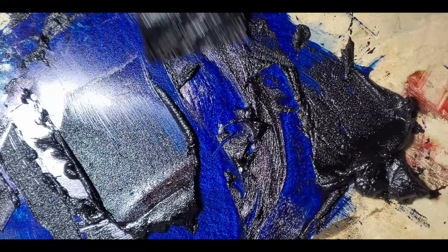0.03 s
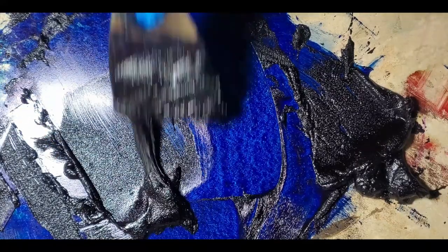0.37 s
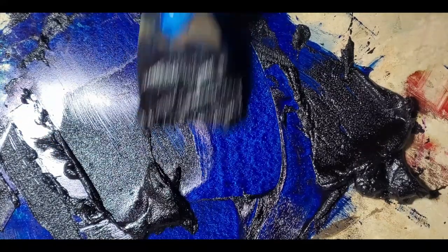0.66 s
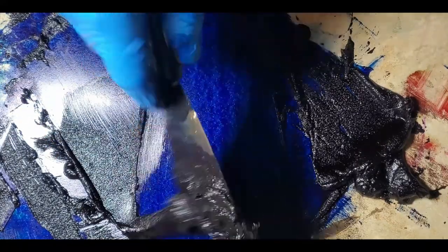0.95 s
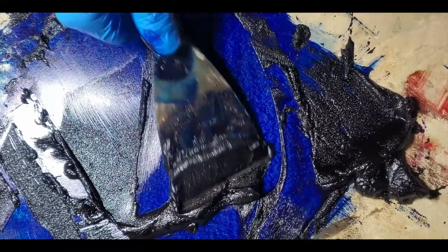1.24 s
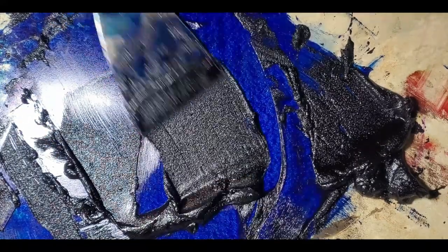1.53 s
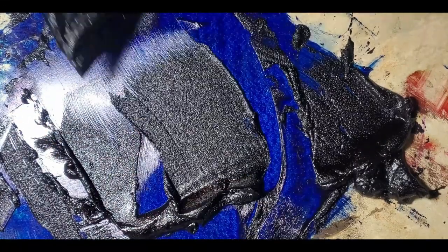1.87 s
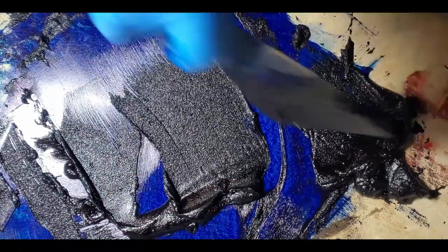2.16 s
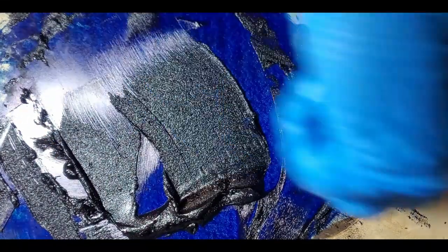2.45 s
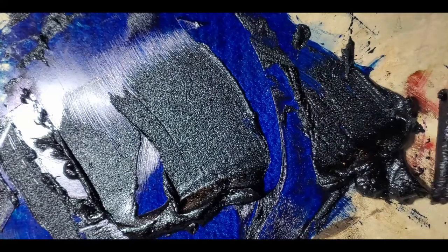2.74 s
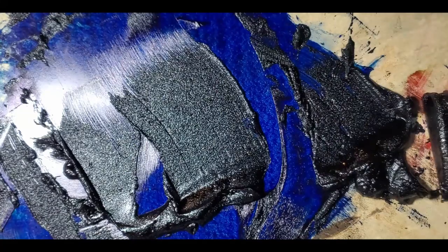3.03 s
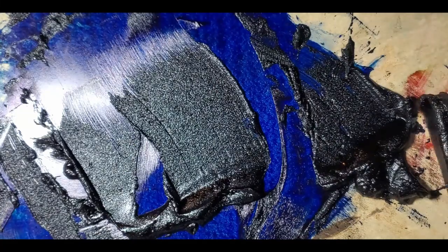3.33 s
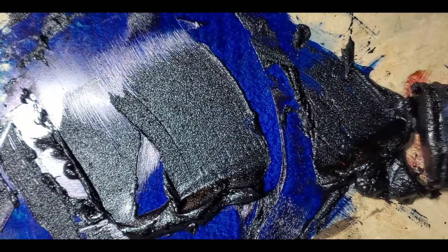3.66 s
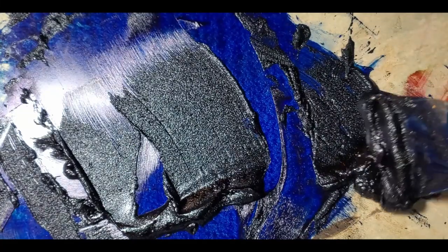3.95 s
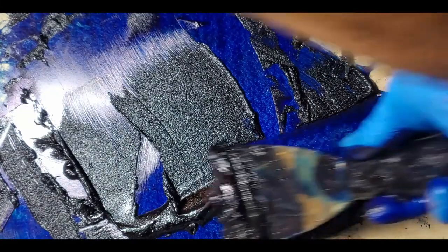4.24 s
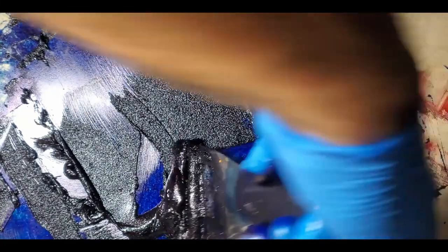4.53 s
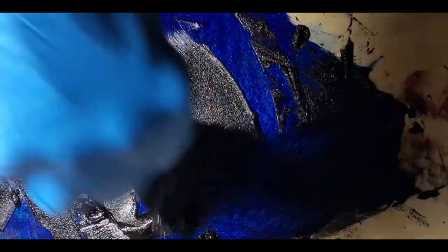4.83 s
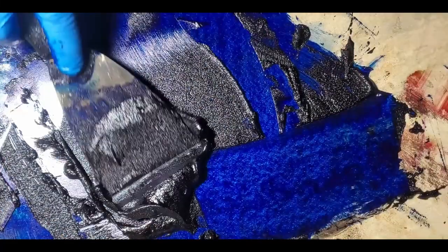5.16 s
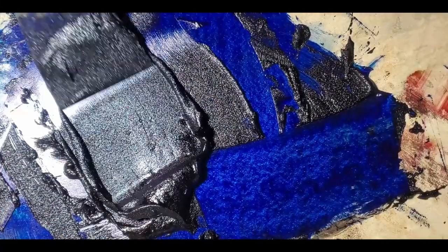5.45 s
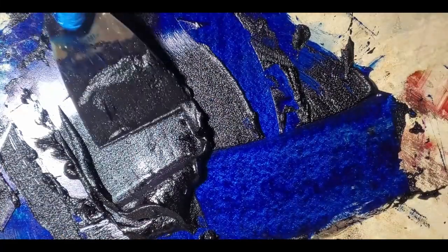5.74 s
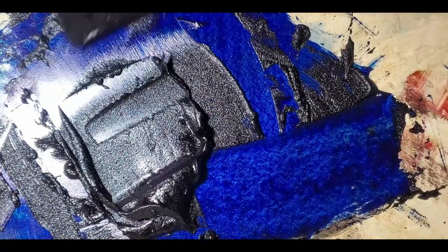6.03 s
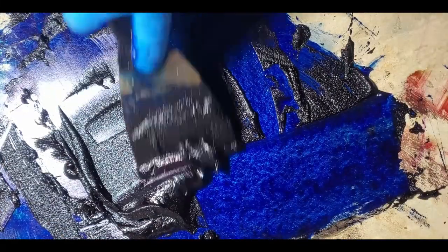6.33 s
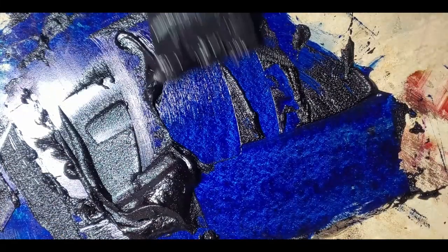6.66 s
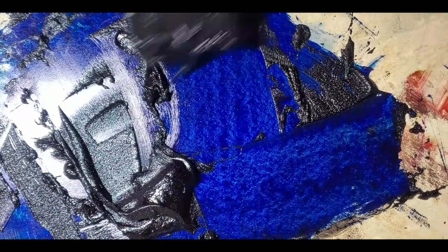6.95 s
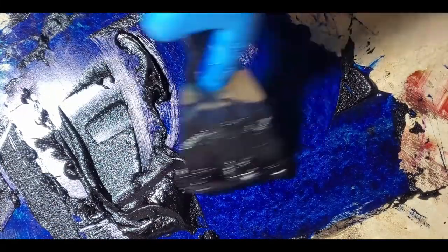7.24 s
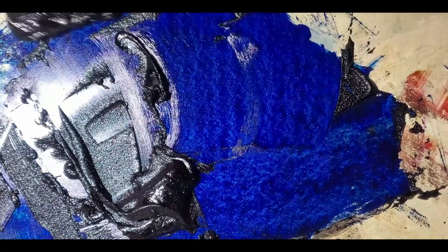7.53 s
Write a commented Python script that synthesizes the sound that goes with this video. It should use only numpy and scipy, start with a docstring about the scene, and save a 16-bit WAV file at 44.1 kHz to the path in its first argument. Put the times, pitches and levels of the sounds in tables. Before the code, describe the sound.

Close by in a quiet studio, a steel palette knife spreads thick paint over a flat plate. Two gritty, hissing scrapes come first, mixed with taps, followed by a lull of faint rustling. Midway the blade clicks repeatedly, the plate knocks dully and a rougher scrape follows. After another pause come three quick strokes, the last with a thud through the table. A ventilation fan hums low throughout.

```python
"""In a quiet studio, a steel palette knife spreads thick, gritty paint over a flat plate, close by.
The blade lands with a tap, then drags: grit crackles under its edge and sets blade and plate ringing.
Faint hiss and rustle come from light blade glides or the moving gloved hand. The plate rocks with dull
knocks, taps thud through the table, and an arm bumps it once. A ventilation fan hums behind it all."""
import sys
import numpy as np
from scipy import signal
from scipy.fft import rfft, irfft, next_fast_len
from scipy.io import wavfile
from scipy.ndimage import uniform_filter1d

SR = 44100
rng = np.random.default_rng(int(sys.argv[2]) if len(sys.argv) > 2 else 0)


def materialize(psi):
    """Save the field psi as 16-bit PCM at rate SR to the path in sys.argv[1].

    A 1-D psi becomes a single channel; in a 2-D psi each row is a channel.
    """
    bounded = np.clip(np.atleast_2d(psi).T, -1, 1)
    quanta = np.round(bounded * 32767).astype(np.int16)
    wavfile.write(sys.argv[1], SR, quanta)


N = 343539

# Levels in the tables are relative. ring_s and fade_s are the time taken to die away by 60 dB.
# Tones of the fan and its motor: pitch_hz, level_db, waver_hz
FAN_TONES = [(41.2, -51.5, 0.056), (57.8, -54, .05), (69.2, -61, .1), (120.2, -60, 0.12), (125.7, -79, 1.1),
             (171, -73, 0.96), (266.6, -69, 1.9), (344, -69.5, 2.8), (406, -67, 2), (486, -72.5, 2.8),
             (550, -69.5, 3.7), (670, -71.5, 2.7), (800, -84.5, 3.7)]
# Tone colour of the moving air and faint hiss: pitch_hz, level_db
AIR_COLOUR = [(20, -33.5), (35, -19.5), (50, 0.5), (80, -8.5), (120, -7), (220, -17.5), (500, -21),
              (1200, -20.5), (2700, -33), (4500, -45), (6800, -49), (8200, -56), (13000, -35.5),
              (16000, -48.5)]
# How alike the air sounds left and right: pitch_hz, likeness (1 same, 0 unrelated, -1 opposite)
AIR_LIKENESS = [(60, 0.96), (300, .9), (1000, 0.68), (4000, 0.058), (12000, .1)]
# Notes the table rings at under the arm: pitch_hz, level_db, ring_s
TABLE_ARM_NOTES = [(75.3, -35.5, 0.63), (104.3, -32, 0.25), (157, -34.5, 0.55), (175.8, -28, 0.38),
                   (202, -29.5, 0.14)]
# Notes the table rings at under the blade: pitch_hz, level_db, ring_s
TABLE_TAP_NOTES = [(63, 2, .4), (78, -21, .3), (182.5, -11.5, 0.15)]
# The plate rocks as weight comes onto it: start_s, level_db
PLATE_ROCKS = [(0.474, -38.5), (0.547, -65), (0.573, -38.5), (3.051, -44), (3.336, -47), (3.438, -41.5),
               (3.808, -41.5)]
# Low notes of the rocking plate: pitch_hz, level_db, ring_s
ROCK_NOTES = [(148.3, 0, 0.15), (210, -5.5, 0.14), (351, 2, 0.14), (393, -11.5, 0.044)]
# Broad tone colour of the scrape: pitch_hz, level_db
SCRAPE_COLOUR = [(120, -41), (200, -1.5), (340, -7.5), (519, -12.5), (683, 1), (791, -10), (1210, 0),
                 (3690, 1), (5330, -10.5), (6880, -13), (7970, -20.5), (12800, -6), (16000, -13)]
# Pitches the scraped plate rings at: pitch_hz, width_hz, strength_db
PLATE_PEAKS = [(372, 60, 8), (669, 54, 12), (700, 70, 12), (853, 25, 8), (1086, 35, 12), (1200, 44, 8),
               (1307, 86, 11), (1437, 165, 10), (1681, 34, 7), (1844, 111, 11), (1917, 33, 12),
               (1942, 24, 9), (2067, 76, 10), (2235, 97, 10), (2367, 68, 11), (2657, 115, 11),
               (2768, 50, 10), (2969, 107, 10), (3131, 250, 6), (3331, 82, 12), (3568, 49, 11),
               (3655, 82, 12), (3850, 103, 12), (3991, 20, 4)]
# Pitches the steel blade rings at: pitch_hz, width_hz, strength_db
BLADE_PEAKS = [(4295, 55, 1), (4551, 91, 4), (4846, 35, 3), (5072, 29, 4), (5258, 39, 2), (5720, 47, 4),
               (5891, 73, 6), (6230, 25, 4), (6835, 151, 5), (7186, 150, 1), (7900, 49, 2), (8508, 35, 6),
               (8703, 35, 7), (9083, 37, 3), (9179, 28, 6), (9497, 38, 7), (9760, 128, 1), (10524, 56, 0),
               (10718, 59, 8), (11146, 100, 3), (11734, 87, 4), (12018, 40, 0), (12476, 38, 7),
               (12716, 55, 5), (13148, 213, 4), (13542, 69, 1), (13950, 300, -1), (14705, 53, 5),
               (15173, 300, 1), (15577, 63, 2)]
# The blade sends its sound unevenly to the two sides: pitch_hz, left_minus_right_db
BLADE_BALANCE = [(700, -1), (1700, 0), (2500, 5), (3700, 3.5), (4500, -6.5), (5300, 3), (7200, -10),
                 (8400, 17), (9800, -1), (11200, 5.5), (13200, 13.5), (15500, 24)]
# How alike the scrape is left and right: pitch_hz, likeness (-1 to 1)
SCRAPE_LIKENESS = [(60, 0.86), (300, 0.99), (700, 0.77), (1400, 0.096), (3100, 0.15), (7000, -0.42),
                   (15000, 0)]
# Faint rustles from light blade glides or the moving gloved hand: start_s, length_s, rasp_db, hiss_db
SOFT_RUSTLES = [(0.505, 0.032, -49, -50), (0.898, 0.32, -68, -63.5), (1.038, 0.088, -66, -62),
                (1.2, 0.064, -49, -48), (1.297, 0.16, -62.5, -61.5), (1.574, 0.36, -67, -62),
                (1.85, 0.75, -67, -61.5), (2.066, 0.21, -80, -68), (3.13, 0.14, -58, -64),
                (3.406, 0.1, -53, -59), (3.565, 0.057, -47, -57), (3.8, 0.13, -53, -53.5),
                (4.65, .45, -72, -58.5), (5.12, 0.12, -81.5, -61.5), (5.348, 0.16, -82, -66),
                (5.456, 0.084, -59, -58), (5.79, 0.093, -59, -60), (6.563, 0.14, -48.5, -36.5)]
# The blade touches down or flicks off: start_s, level_db, knock_db, tick_db, fade_s, table_thud_db
BLADE_TAPS = [(0.468, -30, -9.5, -2, 0.19, -43), (0.5473, -16, -5, -8, 0.087, -40),
              (1.0373, -34, -20, 0.5, 0.03, -72), (1.19, -18.5, -7, -2, 0.038, -37),
              (1.566, -43, -6.5, 1.5, 0.033, -70), (2.242, -49, -6, 3, 0.028, -70),
              (3.051, -40, 15.5, -17, 0.071, -53), (3.115, -36, -5.5, 1, 0.18, -46),
              (3.173, -39, -14, 0.5, 0.092, -72), (3.274, -44.5, 5.5, -9, 0.26, -45.5),
              (3.434, -14, -4.5, -18, 0.057, -39), (3.734, -35, -4, 4.5, 0.088, -42),
              (3.855, -11.5, -6.5, -11.5, 0.14, -40), (3.895, -24, 3, -9.5, 0.12, -60),
              (4.591, -36, -14, 4, 0.089, -76.5), (5.8297, -40.5, -10, 2.5, 0.025, -68),
              (6.089, -31, -4.5, -9, 0.45, -72), (6.549, -21.5, -5.5, -5.5, 0.069, -49),
              (6.798, -43, -12, 8.5, 0.07, -67.5), (7.062, -11, -4, -2, 0.11, -28),
              (7.228, -34.5, -10, 8.5, 0.049, -70), (7.560, -24.5, -10.5, -5, 0.077, -41.5)]
# The blade drags through the paint (drag is the low plate, rasp the grit, hiss the edge):
# start_s, speed_up_s, slow_down_s, drag_db, rasp_db, hiss_db, pressure_drop_db
PAINT_STROKES = [(-0.04, 0.061, 0.23, -39.5, -28, -18, 6), (0.56, 0.12, 0.15, -42, -32, -23, 5),
                 (1.683, 0.033, 0.11, -60.5, -51, -39, 1), (1.763, 0.027, 0.036, -62, -46.5, -37, 7),
                 (3.589, 0.056, 0.029, -26, -22, -30, -1), (3.857, 0.036, 0.079, -32.5, -21.5, -17, -1.5),
                 (3.968, 0.17, 0.22, -39, -27, -17, 8.5), (5.745, 0.016, 0.051, -50.5, -56, -53.5, 4),
                 (6.12, 0.14, 0.096, -43.5, -32.5, -21.5, 2.5), (6.596, 0.051, 0.13, -43, -31, -20, 7),
                 (7.064, 0.0099, 0.15, -44.5, -29.5, -17, 4), (7.603, 0.038, 0.065, -61.5, -54.5, -46, 1.5)]


def from_db(db):
    """Turn decibels into a number to multiply by."""
    return 10 ** (np.asarray(db) / 20)


def unit_level(x):
    """Scale a sound so that the average of left and right has a level (rms) of 1."""
    return x / np.sqrt(np.mean(np.atleast_2d(x).mean(axis=0) ** 2) + 1e-20)


def evened(x, span_s=0.018):
    """Hold the loudness steady, so that only the fine grain is left to chance."""
    power = uniform_filter1d(np.mean(x ** 2, axis=0), int(span_s * SR))
    return unit_level(x / np.sqrt(np.maximum(power, 1e-20)))


def at_hz(points, hz):
    """Read between a table's rows, giving each octave equal room."""
    points = np.array(points)
    return np.interp(np.log(hz + 1), np.log(points[:, 0]), points[:, 1])


def drift(per_s):
    """A smooth random wobble of about size 1, changing about per_s times a second."""
    knots = rng.standard_normal(N // 8)
    return np.interp(np.arange(N) / SR * per_s, np.arange(len(knots)), knots) / np.sqrt(2 / 3)


def butter(x, hz, kind, order=3):
    """Keep the lows, the highs or a band between."""
    return signal.sosfilt(signal.butter(order, hz, kind, fs=SR, output="sos"), x)


def shaped(x, gain_at, size=8192):
    """Colour a sound by gain_at(hz); the filter rings only after a hit (minimum phase)."""
    cepstrum = irfft(np.log(gain_at(np.arange(size // 2 + 1) * SR / size) + 1e-7))
    fold = 1 + np.sign(size // 2 - np.arange(size))
    fold[0] = 1
    response = irfft(np.exp(rfft(cepstrum * fold)))
    return signal.oaconvolve(x, response)[:N]


def stereo_noise(likeness):
    """White noise whose two sides are as alike at each pitch as the table says."""
    size = next_fast_len(N)
    alike = np.clip(at_hz(likeness, np.fft.rfftfreq(size, 1 / SR)), -.999, .999)
    mid, side = rfft(rng.standard_normal((2, size)))
    mid, side = mid * np.sqrt(1 + alike), side * np.sqrt(1 - alike)
    return unit_level(irfft([mid + side, mid - side], size)[:, :N])


def ring(force, notes):
    """Each push sets off pure tones that die away."""
    out = 0
    for hz, db, ring_s in notes:
        decay, turn = from_db(-60 / (ring_s * SR)), 2 * np.pi * hz / SR
        feedback = [1, -2 * decay * np.cos(turn), decay * decay]
        out = out + signal.lfilter([0, from_db(db) * np.sin(turn)], feedback, force + 1e-18)
    return out


def three_bands(x, floor_hz=220, low_hz=1300, high_hz=6000):
    """Split a scrape into the plate's lows, the grit's middle and the edge's highs."""
    low = butter(x, [floor_hz, low_hz], "band")
    return low, butter(x, [low_hz, high_hz], "band"), butter(x, high_hz, "high")


def fan(air_db=-52.5, lag_s=.0003):
    """Motor and fan blades hum in wavering tones over a soft rush of air, reaching the left first."""
    tones = 0
    for hz, db, waver_hz in FAN_TONES:
        cycles = rng.random() + np.cumsum(hz + waver_hz * drift(32)) / SR
        tones = tones + np.sqrt(2) * from_db(db) * np.sin(2 * np.pi * cycles)
    air = [shaped(x, lambda hz: from_db(at_hz(AIR_COLOUR, hz))) for x in stereo_noise(AIR_LIKENESS)]
    left, right = tones + from_db(air_db) * unit_level(np.array(air))
    return np.array([left, np.interp(np.arange(N) - lag_s * SR, np.arange(N), right)])


def studio_echo(x, fade_s=0.2, echo_db=-11.0, gap_s=0.00097, wall_hz=9000):
    """Add the room's weak wash of echoes, dulled by the walls."""
    t = np.arange(SR * 3 // 4) / SR
    noise = butter(rng.standard_normal((2, len(t))), wall_hz, "low", order=1)
    tail = noise * from_db(-60 * t / fade_s) * (t > gap_s)
    tail /= np.sqrt(np.sum(tail ** 2, axis=1, keepdims=True))
    return x + from_db(echo_db) * signal.oaconvolve(x, tail, axes=1)[:, :N]


def arm_bump(start_s=4.599, soft_hz=280, rebound_s=0.06, rebound_db=-6, count=3):
    """A soft blow and its dying rebounds wake only the table's low notes."""
    push = np.zeros(N)
    for k in range(count):
        push[round((start_s + k * rebound_s) * SR)] = from_db(k * rebound_db)
    return butter(ring(push, TABLE_ARM_NOTES), soft_hz, "low")


def rocking_plate(soft_hz=600):
    """The plate tips and knocks dully against the table."""
    push = np.zeros(N)
    for start_s, db in PLATE_ROCKS:
        push[round(start_s * SR)] = from_db(db)
    return butter(ring(push, ROCK_NOTES), soft_hz, "low")


def blade_echo(force, echo_db=-6.5, trip_s=.0022, wander=.1, per_s=4):
    """Waves bounce back from the blade's far end; as the contact moves, the tone colour shifts."""
    now = np.arange(N)
    earlier = now - SR * trip_s * np.exp(wander * drift(per_s))
    return force + from_db(echo_db) * np.array([np.interp(earlier, now, x) for x in force])


def blade_and_plate(force, depth=0.62, neighbours=280):
    """Blade and plate ring at their own pitches; each side hears its own share."""
    def gain(hz, side):
        peaks = 1 + sum(from_db(2 * db) / (1 + (2 * (hz - centre) / width) ** 2)
                        for centre, width, db in PLATE_PEAKS + BLADE_PEAKS)
        # each peak gathers energy from the pitches around it
        ringing = (peaks / uniform_filter1d(peaks, neighbours)) ** (depth / 2)
        share = 1 / np.sqrt(1 + from_db(-2 * side * at_hz(BLADE_BALANCE, hz)))
        return from_db(at_hz(SCRAPE_COLOUR, hz)) * ringing * share
    return np.array([shaped(x, lambda hz: gain(hz, side)) for x, side in zip(force, (1, -1))])


def friction(grains_per_s, grain_db, smear_db, judder_db, snap_s=0.00098):
    """Rubbing: grains of uneven size snap over a smooth smear of noise, and the level judders."""
    sizes = from_db(grain_db * np.minimum(rng.exponential(1, N), 5))
    snaps = (rng.random(N) < grains_per_s / SR) * sizes ** 2
    energy = signal.lfilter([1], [1, -np.exp(-1 / (snap_s * SR))], snaps + 1e-18)
    judder = from_db(judder_db * drift(130))
    strength = np.sqrt(energy / energy.mean() + from_db(2 * smear_db)) * judder
    return blade_and_plate(blade_echo(strength * stereo_noise(SCRAPE_LIKENESS)))


def rustle_levels(swell_s=0.023, sag_db=9, end_db_per_s=200.5):
    """Each rustle swells quickly, fades gently, then dies away fast."""
    t, power = np.arange(N) / SR, np.zeros((2, N))
    for start_s, length_s, rasp_db, hiss_db in SOFT_RUSTLES:
        near = (t >= start_s) & (t < start_s + 1)
        age_s = t[near] - start_s
        fade_db = sag_db * age_s / length_s + end_db_per_s * np.maximum(age_s - length_s, 0)
        swell = np.minimum(age_s / swell_s, 1)
        power[:, near] += from_db([rasp_db - fade_db, hiss_db - fade_db]) ** 2 * swell
    return np.sqrt(power)


def soft_rustles(rasp_db=-1.5):
    """Faint, soft hiss and rustle from light blade glides or the moving gloved hand."""
    rasp, hiss = rustle_levels()
    fizz = friction(grains_per_s=360, grain_db=1.5, smear_db=4.5, judder_db=2.0)
    _, middle, high = map(unit_level, three_bands(fizz))
    return from_db(rasp_db) * rasp * middle + hiss * high


def knife_taps(level_db=-8.0, rasp_db=-5.0, rasp_share=0.22, hold_s=0.0019, rise_s=0.0012):
    """The edge meets the plate along its length: a burst of tiny contacts, and a thud in the table."""
    t, gains, push = np.arange(SR // 2) / SR, np.zeros((3, N + SR)), np.zeros(N)
    for start_s, db, knock_db, tick_db, fade_s, thud_db in BLADE_TAPS:
        at = round(start_s * SR)
        cushion = 1 - np.exp(-t / rise_s)  # the paint softens the first touch
        burst = cushion * from_db(db + level_db - 60 * np.maximum(t - hold_s, 0) / fade_s)
        middle_db = rasp_db + rasp_share * knock_db  # less knock means less rasp too
        gains[:, at:at + len(t)] += from_db([[knock_db], [middle_db], [tick_db]]) * burst
        push[at] = from_db(thud_db)
    contacts = three_bands(friction(grains_per_s=4400, grain_db=2.5, smear_db=3.0, judder_db=1.7))
    ticks = sum(gain[:N] * evened(band) for gain, band in zip(gains, contacts))
    return ticks, ring(push, TABLE_TAP_NOTES)


def stroke_levels(bite_s=0.024, roundness=1.66, slow_loss_db=(2.5, 10.5, 21.5),
                  lift_db_per_s=(378.5, 424, 378)):
    """Levels of drag, rasp and hiss: drag mostly follows pressure, hiss follows speed, rasp both."""
    t, power = np.arange(N) / SR, np.zeros((3, N))
    for start_s, rise_s, fall_s, drag_db, rasp_db, hiss_db, drop_db in PAINT_STROKES:
        near = (t >= start_s) & (t < start_s + 1)
        past_peak_s = t[near] - start_s - rise_s  # zero when the blade is fastest
        slowness = np.minimum(np.maximum(-past_peak_s / rise_s, past_peak_s / fall_s), 1) ** roundness
        pressure_db = -drop_db * np.minimum(past_peak_s, fall_s) / (rise_s + fall_s)
        lifted_s = np.maximum(past_peak_s - fall_s, 0)
        pressed_db = np.array([[drag_db], [rasp_db], [hiss_db]]) + np.outer([1, 1, 0], pressure_db)
        loss_db = np.outer(slow_loss_db, slowness) + np.outer(lift_db_per_s, lifted_s)
        bite = np.minimum((t[near] - start_s) / bite_s, 1)  # the edge sinks into the paint
        power[:, near] += from_db(pressed_db - loss_db) ** 2 * bite
    return np.sqrt(power)


def knife_strokes(drag_db=0.5, hiss_db=-2.5, deep_hz=540, heavy_db=-27,
                  growl_hz=2900, sharp_above_db=6, brightening=0.35):
    """Pressing drives the plate, heavy pressing its deepest notes too; speed brings out the hiss."""
    drag, rasp, hiss = stroke_levels()
    grit = friction(grains_per_s=1700, grain_db=1.0, smear_db=11.5, judder_db=0.64)
    low, middle, high = (evened(band, span_s=.04) for band in three_bands(grit))
    weight = np.minimum(np.sqrt(drag / from_db(heavy_db)), 1)
    plate = butter(low, deep_hz, "high") + weight * butter(low, deep_hz, "low")
    # a slow, pressed blade growls; a fast, hissing one rasps higher
    sharp = ((hiss + 1e-9) / (from_db(sharp_above_db) * rasp + 1e-9)) ** brightening
    growl = butter(middle, growl_hz, "low", order=1)
    scrape = (sharp * (middle - growl) + growl / sharp) / np.sqrt((sharp ** 2 + sharp ** -2) / 2)
    return from_db(drag_db) * drag * plate + rasp * scrape + from_db(hiss_db) * hiss * high


def scene():
    """Knife, plate and table in the studio, over the fan."""
    ticks, thuds = knife_taps()
    painting = studio_echo(knife_strokes() + soft_rustles() + ticks + rocking_plate())
    table = butter(thuds + arm_bump(), 35, "high", order=2)
    return painting + table + fan()


def record(dry):
    """Cut off the very highest treble steeply."""
    cutoff_hz = 15800
    return signal.sosfilt(signal.ellip(10, .2, 80, cutoff_hz, fs=SR, output="sos"), dry)


dry = scene()
out = record(dry)
materialize(out)
```